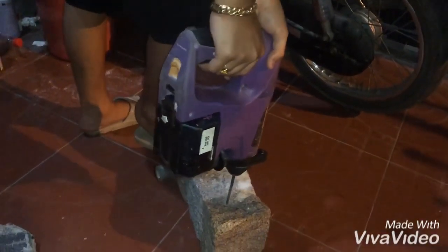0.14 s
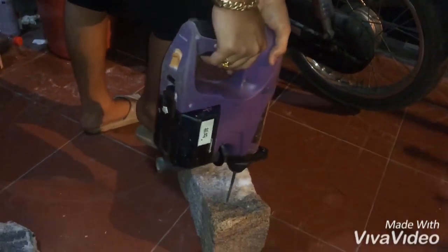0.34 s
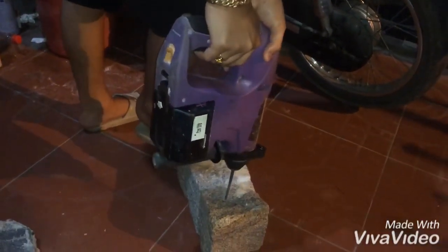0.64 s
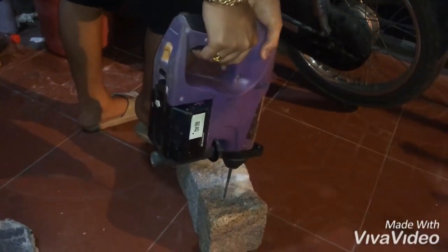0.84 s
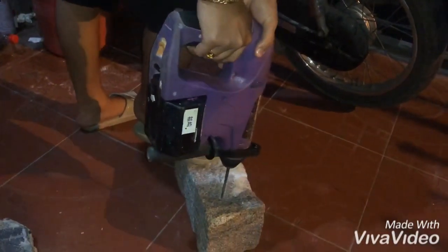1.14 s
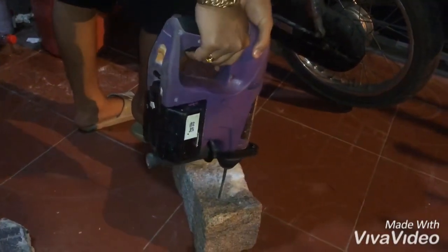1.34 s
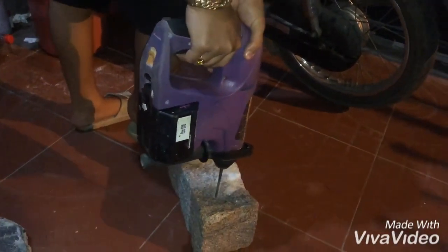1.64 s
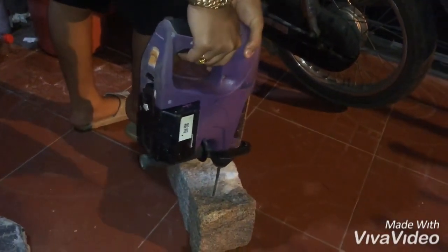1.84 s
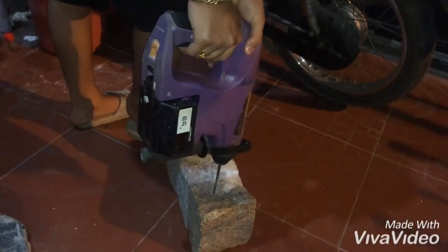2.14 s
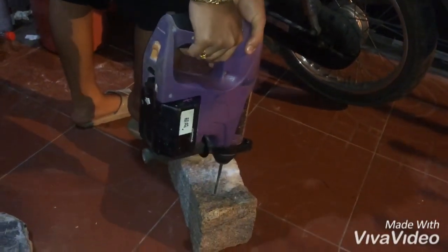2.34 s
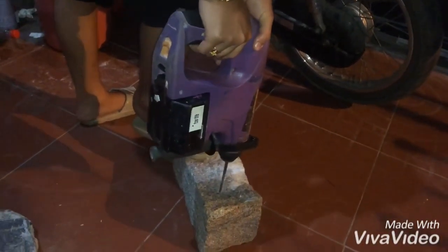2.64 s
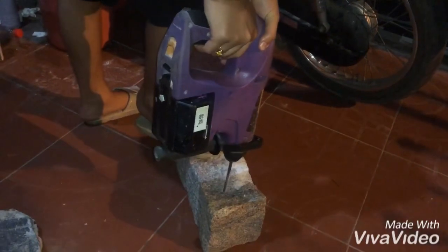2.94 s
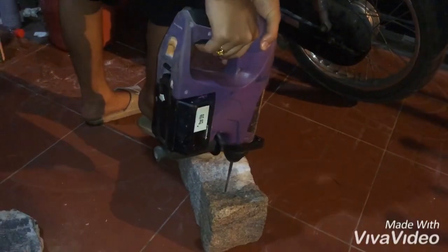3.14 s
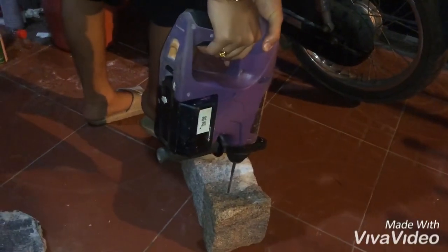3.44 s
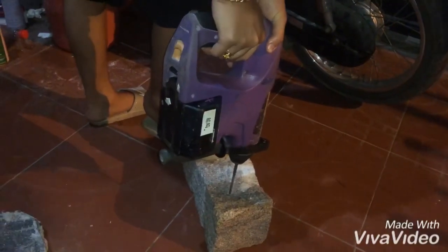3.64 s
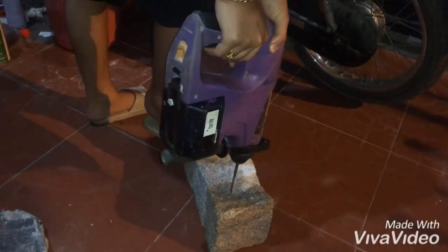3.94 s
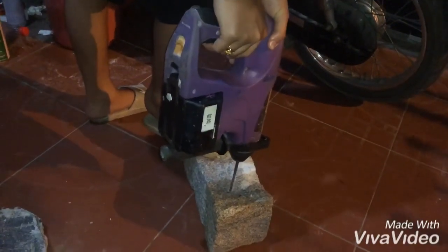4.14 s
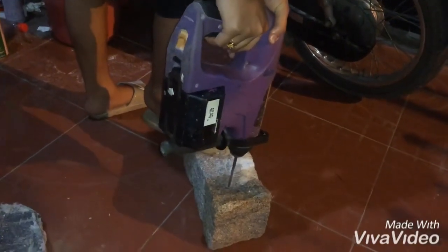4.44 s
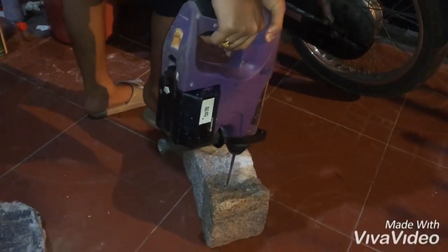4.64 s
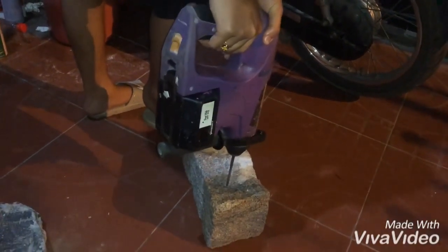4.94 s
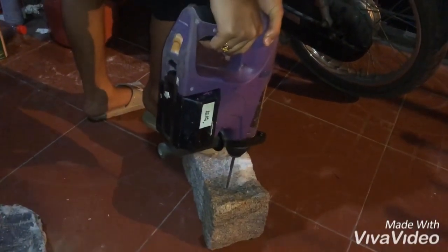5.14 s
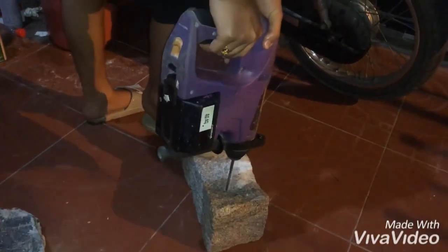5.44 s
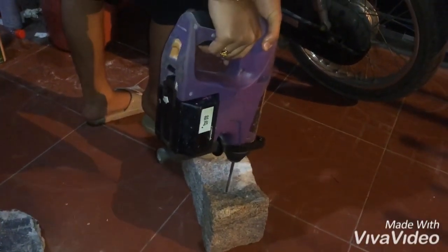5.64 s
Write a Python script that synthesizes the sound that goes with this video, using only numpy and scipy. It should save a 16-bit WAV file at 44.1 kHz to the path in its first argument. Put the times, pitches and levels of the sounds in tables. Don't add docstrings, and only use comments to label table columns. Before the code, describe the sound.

Continuous hammer drilling under load, heard close on a phone in a small tiled room. Rapid dull knocks and sharp gritty bursts blur into a coarse low buzz, with housing drone, hissing motor and piercing bit ring. The blows sway unevenly as the bit turns, and the whole slowly softens while staying bright.

```python
import sys
import numpy as np
from scipy import signal
from scipy.fft import rfft, irfft
from scipy.io import wavfile
from scipy.ndimage import uniform_filter1d

SR = 44100
rng = np.random.default_rng(int(sys.argv[2]) if len(sys.argv) > 2 else 0)


def convert_level_to_amplitude(level_db):
    exponent = np.asarray(level_db, float) / 20
    return 10 ** exponent


def generate_wav(sig):
    pcm = np.round(np.clip(np.atleast_2d(sig).T, -1, 1) * 32767).astype(np.int16)
    wavfile.write(sys.argv[1], SR, pcm)


N = 255337
TURN = 0.3527


def unit(x):
    return x / np.sqrt(np.mean(x ** 2))


def band(x, lo_hz, hi_hz, order=2):
    sos = signal.butter(order, [lo_hz, min(hi_hz, 0.45 * SR)], "band", fs=SR, output="sos")
    return signal.sosfilt(sos, x)


def mode(x, hz, width_hz):
    return signal.lfilter(*signal.iirpeak(hz, hz / width_hz, SR), x)


def fade(x, ms):
    return signal.lfilter([1], [1, -np.exp(-1000 / (max(ms, 0.02) * SR))], x)


def cycle(turns):
    return np.cos(2 * np.pi * turns)


def walk(rate_hz):
    count = int(N / SR * rate_hz) + 2
    held = np.repeat(rng.standard_normal(count), 16)
    slewed = uniform_filter1d(uniform_filter1d(held, size=16), size=16)
    return unit(np.interp(np.arange(N) / SR * rate_hz * 16, np.arange(len(held)), slewed))


def either_side():
    return np.repeat(rng.choice([-1, 1], N // 64 + 1), 64)[:N]


def hits(phase, place, scatter_db, sway_db, force_db, jitter=0.0072):
    late, strength = rng.standard_normal((len(force_db), 2)).T
    stroke = np.arange(len(force_db)) + place
    at = np.interp(stroke + jitter * late, phase, np.arange(N)).astype(int)
    sway = sway_db * np.sin(2 * np.pi * TURN * stroke)
    size = convert_level_to_amplitude(force_db + scatter_db * strength + sway)
    heard = (stroke < phase[-1]) * (stroke > phase[0])
    return np.bincount(at, size * heard, N)


def answer(hz, db, db_per_hz, db_per_s, flicker_db, rate_hz):
    pressure = hz - 57.4
    return db + db_per_hz * pressure + db_per_s * np.arange(N) / SR + flicker_db * walk(rate_hz)


# t/s, stroke rate f/Hz
STROKE_RATE = [(0.0, 57.03), (0.36, 56.78), (0.72, 57.87), (1.09, 57.62), (1.45, 57.85), (1.81, 57.92),
               (2.17, 57.54), (2.53, 57.86), (2.9, 57.22), (3.26, 56.91), (3.62, 57.6), (3.98, 57.33),
               (4.34, 57.39), (4.7, 56.8), (5.07, 57.14), (5.43, 56.79), (5.79, 57.87)]


def piston(t):
    hz = np.interp(t, *np.transpose(STROKE_RATE))
    return hz, 0.11 + np.cumsum(hz) / SR


# times per turn, level/dB, start/cycles
UNEVEN_HOLE = [
    (1, .9, -.45),
    (2, 2.1, .35),
    (3, 1.2, .47),
]


def rebound(phase):
    start_place, end_place, slew_ms, chance_db = 0.52, 0.14, 0.46, 1.46
    stroke = np.floor(phase - end_place + 1).astype(int)
    late = 1.0 * (phase - stroke + 1 > start_place)
    n = np.arange(stroke.max() + 1)
    db = sum(depth * cycle(k * TURN / 2 * (n - 1) + start) for k, depth, start in UNEVEN_HOLE)
    db = db + chance_db * rng.standard_normal(len(n))
    slew = int(slew_ms * SR / 1000) + 1
    return uniform_filter1d(late, slew), uniform_filter1d(late * db[stroke], slew)


# f/Hz, density level/dB per Hz
MOTOR_COLOUR = [(18, -30), (90, -39), (140, -7), (250, -7.5), (330, -15), (600, -22), (1520, -38.5),
                (2300, -15.5), (2500, -16.5), (5400, -18.5), (8800, -14), (10500, -16), (14000, -10),
                (15800, -16)]


def motor():
    hz = np.fft.rfftfreq(N, 1 / SR) + 1
    table_hz, table_db = np.transpose(MOTOR_COLOUR)
    colour = convert_level_to_amplitude(np.interp(np.log(hz), np.log(table_hz), table_db))
    hiss = unit(irfft(rfft(rng.standard_normal(N)) * colour, N))
    return convert_level_to_amplitude(0.31 * walk(24.66)) * hiss


# multiple of stroke rate, level/dB
DRONE_HARMONICS = [(1, -20), (2, -11), (3, 1.5), (4, -13), (5, -12), (6, -11.5), (7, -11), (8, -5),
                   (9, -11.5), (10, -4.5), (11, -12), (12, -5.5), (13, -9), (14, -8), (15, -14.5),
                   (16, -11.5), (17, -8), (18, -6), (19, -2.5), (20, -7), (21, -5.5), (23, -10), (24, -5),
                   (25, -5), (26, -3), (27, -5), (29, -12), (34, -18), (39, -3.5), (40, -5.5)]


def drone(phase, late_db):
    out = 0
    for k, db in DRONE_HARMONICS:
        place = 0.71 if k < 7 else 0.66 if k < 16 else 0.14 if k < 24 else 0.56
        loose = 0.12 * rng.standard_normal() * (k > 6)
        sway_db = (0.17 + 0.028 * k) * walk(30) + 0.99 * late_db * (k > 6)
        wander = 0.001 * k * walk(25)
        out = out + convert_level_to_amplitude(db - 0.15 * k + sway_db) * cycle(k * (phase - place) + loose + wander)
    return out


def floor_rumble(phase):
    return (1 + 0.31 * cycle(phase)) * unit(band(rng.standard_normal(N), 15, 52, order=1))


def block(phase, hz):
    grit = rng.standard_normal(N)
    flare = np.exp(2.0 * cycle(phase - 0.52)) + 0.4 * np.exp(2.2 * cycle(phase - 0.13))
    grind = (1 + 0.5 * cycle(phase - 0.4)) * grit
    low_db = answer(hz, db=-31, db_per_hz=3, db_per_s=-2, flicker_db=1, rate_hz=3.2)
    high_db = answer(hz, db=-35.5, db_per_hz=-4, db_per_s=0.26, flicker_db=1, rate_hz=3)
    low = convert_level_to_amplitude(low_db) * unit(mode(flare * grit, 1550, 95))
    return low + convert_level_to_amplitude(high_db) * unit(band(grind, 2165, 2315, order=3))


# place in stroke (0-1), low f/Hz, high f/Hz, rise t/ms, decay t/ms, level/dB, scatter/dB
GRIT_BURSTS = [
    (0.17, 2070, 5600, 0.44, 6.5, -1.5, 1.05),
    (0.17, 6240, 8100, 0.24, 9.1, -8, 2),
    (0.17, 8900, 16400, 0.27, 1.7, -2.5, 3.5),
    (0.5, 9700, 14000, 0.13, 0.34, 0, 5),
    (0.489, 4400, 9400, 0.14, 1.6, -8, 2.5),
    (0.51, 1060, 4900, 0.45, 1.3, -13.5, 1.5),
    (0.13, 360, 2670, 0.91, 3.6, -4.5, 1.7),
    (0.75, 870, 4200, 0.94, 3.9, -9, 3.5),
]


def bursts(phase, force_db, bright_db):
    out = 0
    for place, lo_hz, hi_hz, rise_ms, decay_ms, db, scatter_db in GRIT_BURSTS:
        impact = hits(phase, place, scatter_db, 0.18, force_db)
        gate = fade(fade(impact, rise_ms), decay_ms)
        grain = rng.standard_normal(N) * convert_level_to_amplitude(1.2 * rng.standard_normal(N))
        level = convert_level_to_amplitude(db + bright_db * (lo_hz > 4000))
        out = out + level * unit(gate * band(grain, lo_hz, hi_hz))
    return out


# place in stroke (0-1), centre f/Hz, level/dB, scatter/dB, sway/dB
DULL_KNOCKS = [
    (0.081, 1210, 1, 2.5, 1.5),
    (0.159, 674, 0.5, 3, -1),
    (.22, 1136, 0.5, 0.5, -2),
    (0.37, 680, -0.5, 6, 1.5),
    (.52, 1560, -0.5, 3, 1),
    (0.632, 665, -4.5, 1.5, -2),
    (0.901, 760, -6.5, 5, -4),
    (.485, 10700, 2.5, 4, -2),
]


def knocks(phase, force_db):
    side = either_side()
    out = 0
    for place, hz, db, scatter_db, sway_db in DULL_KNOCKS:
        push = side * hits(phase, place, scatter_db, sway_db, force_db)
        out = out + convert_level_to_amplitude(db) * unit(band(push, hz / 1.404, hz * 1.554))
    return out


# f/Hz, width f/Hz, level/dB
BODY_MODES = [(1141, 28, -7), (1384, 38, 0), (1546, 54, 0.5), (1660, 65, -1), (1964, 120, -2.5),
              (2124, 51, -1), (2201, 21, 0), (3110, 1000, -7.5), (3690, 270, -2.5), (4206, 190, -1),
              (4860, 220, -3.5), (6590, 1000, -2), (7600, 270, -4.5)]


def body(blows):
    return blows + sum(convert_level_to_amplitude(db) * mode(blows, hz, width_hz) for hz, width_hz, db in BODY_MODES)


def clank(phase, force_db):
    hz, width_hz = 3090, 170
    push = either_side() * hits(phase, 0.19, 6.5, 0, force_db)
    return convert_level_to_amplitude(-17.5) * unit(mode(mode(push, hz, width_hz), hz, 2 * width_hz))


# f/Hz, width f/Hz, level/dB
SHANK_MODES = [
    (11700, 70, -22),
    (12230, 200, -11),
    (13200, 70, -24),
    (13650, 900, -12),
]


def bit(phase, hz, force_db):
    low_db = answer(hz, db=-9.5, db_per_hz=-1, db_per_s=0.5, flicker_db=1.3, rate_hz=14)
    high_db = answer(hz, db=-1.5, db_per_hz=4, db_per_s=-1, flicker_db=1.2, rate_hz=9)
    gate = fade(fade(hits(phase, 0.11, 1.5, 0.5, force_db), 0.42), 3.9)
    push = (unit(gate) + 0.8) * rng.standard_normal(N)
    weak = sum(convert_level_to_amplitude(db) * unit(mode(push, f, width_hz)) for f, width_hz, db in SHANK_MODES)
    low = convert_level_to_amplitude(low_db) * unit(mode(push, 9000, 36))
    high = convert_level_to_amplitude(high_db) * unit(mode(push, 14390, 62))
    return low - high + weak


def room(x):
    t60 = 0.39
    t = np.arange(int(0.5 * SR)) / SR
    decay = np.exp(-np.log(1000) * t / t60) * (t > 0.004)
    tail = band(rng.standard_normal(len(t)), 230, 6000, order=1) * decay
    return signal.fftconvolve(x, tail / np.sqrt(np.sum(tail ** 2)))[:N]


def scene():
    t = np.arange(N) / SR
    hz, phase = piston(t)
    level_db = -17 - 0.2929 * t - 0.37 * walk(13)
    bright_db = 0.4 * (t - t.mean()) - 0.64 * walk(12)
    force_db = 0.35 * rng.standard_normal(400)
    late, late_db = rebound(phase)

    grit = convert_level_to_amplitude(-0.5) * unit(bursts(phase, force_db, bright_db))
    blows = convert_level_to_amplitude(-4.5) * unit(knocks(phase, force_db)) + grit
    rings = convert_level_to_amplitude(-0.94 * late) * bit(phase, hz, force_db)
    tool = convert_level_to_amplitude(1.0) * unit(body(blows)) + rings + clank(phase, force_db) + convert_level_to_amplitude(-4.5) * motor()
    tool = convert_level_to_amplitude(late_db) * tool

    heard = convert_level_to_amplitude(level_db) * (tool + convert_level_to_amplitude(-17.5) * room(tool))
    heard = heard + convert_level_to_amplitude(late_db) * block(phase, hz)
    heard = heard + convert_level_to_amplitude(-24.5) * drone(phase, late_db) + convert_level_to_amplitude(-43) * floor_rumble(phase)
    return heard[None]


def roll_off(x):
    return signal.sosfilt(signal.butter(12, 16030, fs=SR, output="sos"), x)


def record(dry):
    thin = signal.sosfilt(signal.butter(2, 60, "high", fs=SR, output="sos"), dry)
    soft = np.tanh(1.1 * thin) / 1.1
    return roll_off(soft)


dry = scene()
out = record(dry)
generate_wav(out)
```